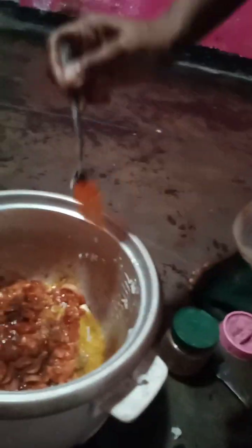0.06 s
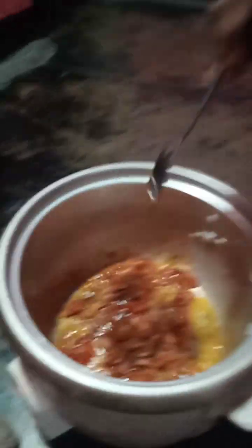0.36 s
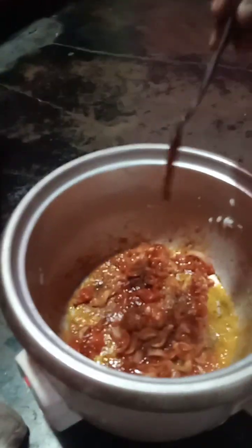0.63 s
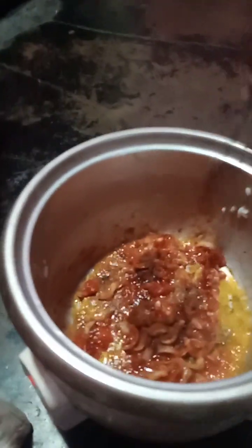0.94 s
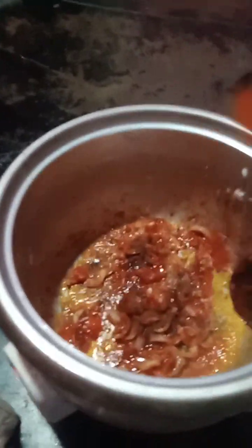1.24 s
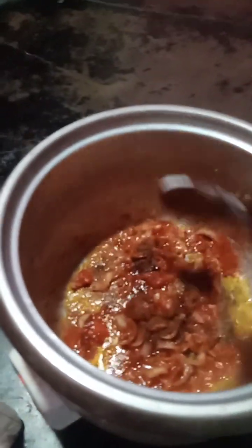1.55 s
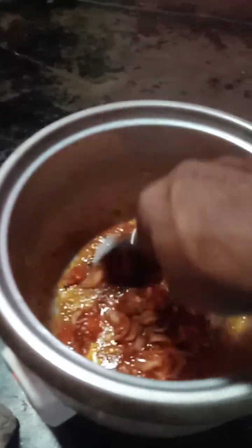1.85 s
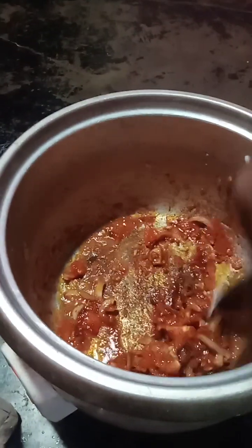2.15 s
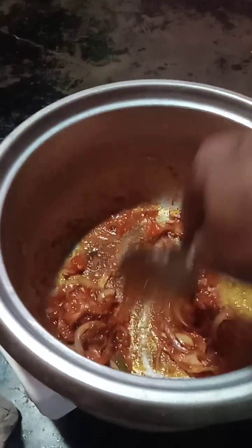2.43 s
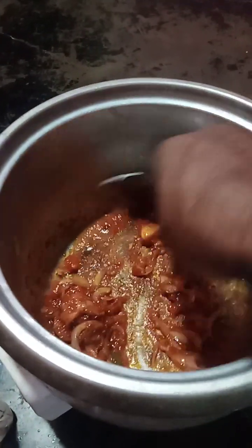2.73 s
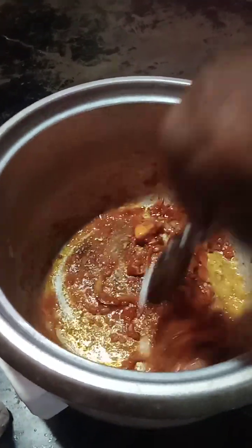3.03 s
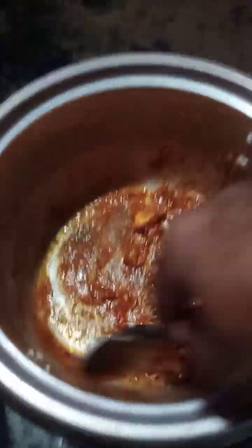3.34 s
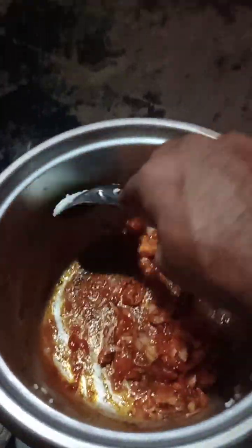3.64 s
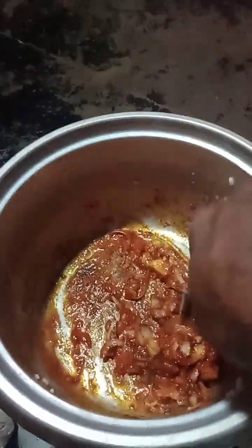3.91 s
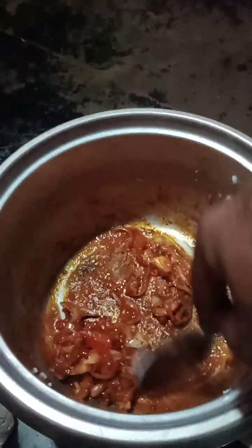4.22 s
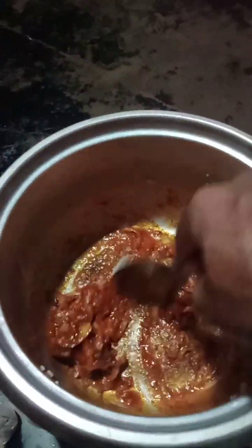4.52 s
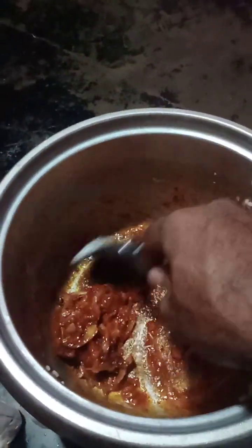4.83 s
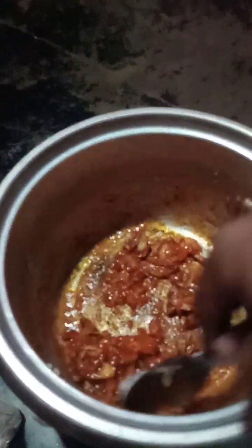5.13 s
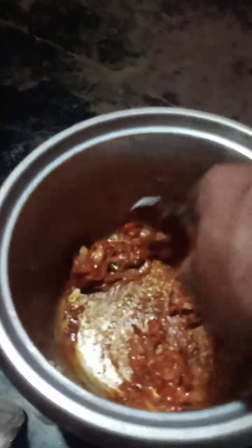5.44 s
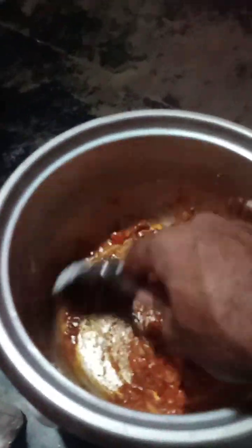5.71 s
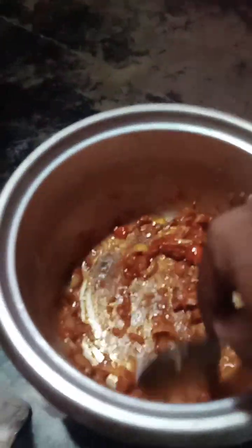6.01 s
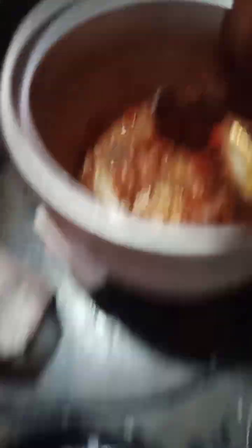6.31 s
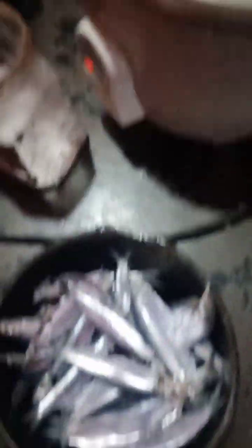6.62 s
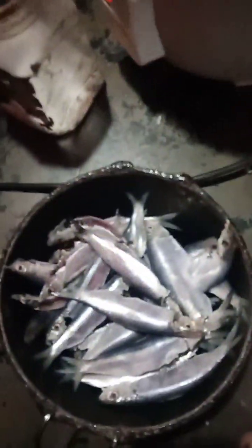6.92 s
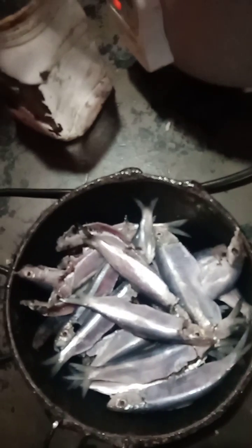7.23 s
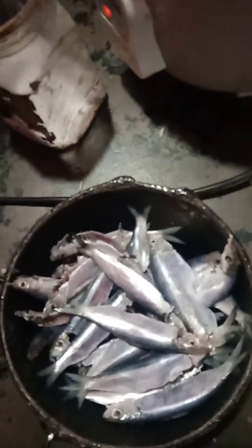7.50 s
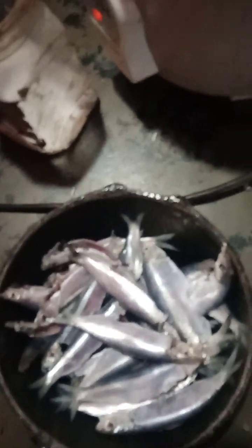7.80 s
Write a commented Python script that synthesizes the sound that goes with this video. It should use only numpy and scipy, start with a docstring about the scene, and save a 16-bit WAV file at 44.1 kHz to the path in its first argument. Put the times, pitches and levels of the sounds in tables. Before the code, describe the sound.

Spice paste fries in a metal pot throughout, a soft, grainy sizzle over a faint low simmer, heard from close by in a small kitchen. At about 0.9 seconds a steel spoon knocks twice on the rim, ringing briefly. From 1.5 seconds it stirs unevenly, with short scrapes, dull taps, tiny squeaks and faint wet squelches, the sizzle swelling slightly behind the strokes. A sharp, ringing clank lands at 2 seconds, another at 4.2 and a hard one at 5.9. Between them, taps and scrapes bunch together around 2.6, from 3.5 to 4, and from 5 to 5.4 seconds. From about 6 to 6.6 seconds the microphone turns away and the sizzle becomes a little softer and duller. Lighter knocks and hollow scrapes follow around 6.9 and 7.3 seconds, with a last scrape and clink just before the end at 8 seconds.

```python
"""A small kitchen, a phone's microphone close to the metal pot of an electric cooker.
Spice paste fries in it: steam bubbles burst in the oil as a grainy hiss over a low simmer. A steel
spoon knocks on the rim and sets the metal ringing, then scrapes, squeaks and taps around the pot,
the paste squelching behind it. Near the end the microphone turns away and the sizzle is shaded;
the phone's limiter holds the hard blows down to a plateau."""
import sys
import numpy as np
from scipy import signal
from scipy.fft import rfft, irfft, next_fast_len
from scipy.io import wavfile
from scipy.ndimage import uniform_filter1d, minimum_filter1d

SR = 44100
rng = np.random.default_rng(int(sys.argv[2]) if len(sys.argv) > 2 else 0)


def generate_wav(sig):
    """Save sig (samples, or channels by samples) to the path in sys.argv[1] as 16-bit PCM at SR."""
    pcm = np.round(np.clip(np.atleast_2d(sig).T, -1, 1) * 32767).astype(np.int16)
    wavfile.write(sys.argv[1], SR, pcm)


N = 351036
TIME = np.arange(N) / SR
FFT_SIZE = next_fast_len(N, True)
FREQ = np.maximum(np.fft.rfftfreq(FFT_SIZE, 1 / SR), 1)
ATTACK_S = .001

# The edges in Hz of the five bands into which the dense modes of the metal fall.
METAL_BANDS_HZ = [250, 600, 1500, 3000, 6000, 12000]
# The spoon dragged over the metal. Each row: start and length in seconds, pot body and spoon edge
# in relative dB, brightness in octaves above 1 kHz.
STROKES = [(1.552, 0.04, -50, -24.5, 3.43), (1.585, .06, -28.5, -46, 0.84), (1.713, .11, -33.5, -39.5, 1.2),
           (2.243, 0.13, -43, -41, 2.1), (2.577, 0.047, -38, -33, 2.3), (2.609, 0.029, -24.5, -28.5, 0.47),
           (2.691, .12, -35, -35.5, 2.46), (3.02, 0.062, -80, -43.5, 3.6), (3.222, 0.095, -43, -47, 2.4),
           (3.332, 0.04, -42, -36.5, 2.23), (3.409, 0.027, -34, -47, .5), (3.526, .03, -59, -40.5, 2.1),
           (3.605, 0.087, -44.5, -32.5, 3.46), (3.697, .14, -27.5, -28.5, 2.6),
           (4.291, 0.052, -44.5, -40, 2.5), (4.356, 0.07, -41, -48.5, 1.5),
           (4.721, .06, -31.5, -32.5, 1.64), (5.084, 0.17, -44, -42, 1.8),
           (5.555, 0.047, -49.5, -42.5, 2.9), (5.637, 0.074, -34, -37, 1.8),
           (6.033, 0.049, -52, -39.5, 1.66), (6.842, 0.13, -38, -44.5, 1.9), (7.281, .13, -39, -45, 1.4),
           (7.754, .19, -32.5, -39.5, 2.2)]


def undb(db):
    """Decibels to gain."""
    return 10 ** (np.asarray(db) / 20)


def unit(x):
    """Scale to rms 1."""
    return x / np.sqrt(np.mean(x ** 2))


def fade(t, t60):
    """Exponential decay, 60 dB down after t60 seconds."""
    return np.exp(-np.log(1000) * t / t60)


def colour(points):
    """Gain at every frequency from (Hz, dB) points."""
    hz, db = np.transpose(points)
    return undb(np.interp(np.log(FREQ), np.log(hz), db))


def fader(points):
    """Gain at every sample from (seconds, dB) points."""
    return undb(np.interp(TIME, *np.transpose(points)))


def shape(x, gain):
    """Filter by a gain at every frequency."""
    return irfft(rfft(x, FFT_SIZE) * gain, FFT_SIZE)[:N]


def walk(per_s):
    """Smooth random wander with a spread near 1."""
    knots = rng.standard_normal(int(N / SR * per_s) + 2)
    return np.interp(TIME * per_s, np.arange(len(knots)), knots)


def clicks(per_s, spread_db):
    """Randomly timed impulses; with a spread, most are small and a few large."""
    return (rng.random(N) < per_s / SR) * undb(spread_db * np.minimum(rng.exponential(size=N), 5))


def span(start, length):
    """The samples of an event and the time since its start."""
    where = slice(int(start * SR), min(int((start + length) * SR), N))
    return where, TIME[where] - TIME[where.start]


def sizzle(flicker_db=2.35, turn_start_s=6.06, turn_end_s=6.62):
    """Tiny steam bubbles burst in the oil, so many that they merge into a soft grainy hiss."""
    # The colour of frying oil as heard through the phone's microphone, with its treble peaks and dip.
    # Each row: frequency in Hz, gain in dB.
    oil_at_mic = [(300, -19), (650, -24), (1220, -10), (1550, -21), (2400, -11), (3300, -12), (4100, -2),
                  (4900, -12), (6050, 0.5), (6650, -6), (7500, 0.5), (9300, -11), (13600, -30),
                  (15100, -9.5)]
    # How hard the oil fries. Each row: time in seconds, relative level in dB.
    frying_levels = [(0, -49), (.35, -45.5), (.9, -44), (1.35, -41.5), (3, -44), (4.4, -44.5), (5.4, -40.5),
                     (6.2, -43.5), (7.96, -45)]
    # The finest fizz against the hiss. Each row: time in seconds, gain in dB before shading.
    fizz_levels = [(0, 0), (1.2, -4), (1.8, 4), (3, 4), (3.9, 7.5), (5.1, 1), (6, 4), (7.96, -4)]
    pops = unit(clicks(per_s=2500, spread_db=2.5) * rng.standard_normal(N))
    bursts = (pops + rng.standard_normal(N)) * undb(flicker_db * walk(35))
    band = np.digitize(FREQ, [5000, 9500])
    spatter, hiss, fizz = (shape(bursts, colour(oil_at_mic) * (band == k)) for k in range(3))
    steady, stirred = fader(frying_levels), flare()
    # as the microphone turns away, the pot's wall comes between it and the oil
    shade = np.clip((TIME - turn_start_s) / (turn_end_s - turn_start_s), 0, 1)
    spatter_gain = np.hypot(undb(-5) * steady, undb(2.5) * stirred) * undb(-11 * shade)
    hiss_gain = np.hypot(steady, stirred) * undb(1 - 2.2 * shade)
    fizz_gain = fader(fizz_levels) * undb(-5 * shade)
    return unit(hiss + fizz * fizz_gain) * hiss_gain + unit(spatter) * spatter_gain


def simmer(heave_db=4, gain_db=2):
    """The thick paste heaves and slides with a low uneven rumble."""
    # The colour of simmering paste. Each row: frequency in Hz, gain in dB.
    paste_colour = [(25, -16), (45, -37), (64, 7), (95, -10), (132, 5), (175, -7), (243, -2), (310, -20.5),
                    (400, -13), (600, -23.5), (1500, -24)]
    # How much the paste moves. Each row: time in seconds, relative level in dB.
    simmer_levels = [(0, -58.5), (1.05, -63.5), (1.6, -55.5), (2.7, -51), (4.1, -53), (4.5, -55),
                     (6.2, -53.5), (7, -56), (7.96, -71)]
    heaving = rng.standard_normal(N) * undb(heave_db * walk(28))
    return unit(shape(heaving, colour(paste_colour))) * fader(simmer_levels) * undb(gain_db)


def dense_modes(points):
    """Countless overlapping modes of metal, coloured by the pot's cavity, as five bands of rms 1."""
    # Resonances of the air in the pot. Each row: centre in Hz, width in Hz, lift in dB.
    air_resonances = [(257, 90, 13), (370.6, 80, 19), (446.8, 99, 26), (830, 253, 21), (1123, 168, 21),
                      (1262, 107, 23), (1737, 120, 6.5), (2326, 560, 8)]
    cavity_db = sum(db / (1 + (2 * (FREQ - hz) / width) ** 2) for hz, width, db in air_resonances)
    gain = colour(points) * undb(cavity_db)
    noise = rng.standard_normal(N)
    band = np.digitize(FREQ, METAL_BANDS_HZ[1:-1])
    return np.array([unit(shape(noise, gain * (band == k))) for k in range(len(METAL_BANDS_HZ) - 1)])


def contact(body_db, edge_db, brightness, body_hz, body_fall_db, edge_fall_db):
    """Band gains of one contact: a low hump from the pot's body, a broad one from the spoon's edge."""
    centres_hz = np.sqrt(np.multiply(METAL_BANDS_HZ[:-1], METAL_BANDS_HZ[1:]))
    octaves = np.log2(centres_hz / 1000)
    # the body sounds higher the harder it is pressed
    octaves_per_db, medium_press_db = .0532, -35
    body_octave = np.log2(body_hz / 1000) + octaves_per_db * (body_db - medium_press_db)
    body = undb(body_db - body_fall_db * (octaves - body_octave) ** 2)
    edge = undb(edge_db - edge_fall_db * (octaves - brightness) ** 2)
    return np.hypot(body, edge)


def snap(t):
    """The first instant of hard contact: a tick that reaches the very top."""
    return np.diff(rng.standard_normal(len(t) + 1)) * fade(t, t60=.0086)


def strikes(metal, snap_db=10, crack_db=15, ring_db=-11, grip_per_cycle=.0029):
    """Each hard blow cracks, sets the dense modes shimmering and leaves a few strong modes singing."""
    # Blows on rim and wall. Each row: start in seconds, pot body and spoon edge in relative dB,
    # brightness in octaves above 1 kHz, ringing in relative dB, frequency the spot favours in Hz,
    # lift of the lowest modes in dB, freedom to ring from 0 to 1.
    blows = [(.860, -52, -20.5, 2.1, -.5, 2100, -0.5, .6), (0.9817, -65, -28, 2.35, -13, 1900, 10, 0.97),
             (2.046, -48, -16.5, 1.98, 2, 2275, -15, 0.69), (4.162, -35, -24.5, 2.9, -10, 2030, -6, .8),
             (5.8547, -27.5, -18.5, 3, -3.5, 4075, -8.5, 0.56),
             (6.957, -45, -60, .6, -30.5, 1650, -3, 0.87), (7.2388, -40, -32.5, 3.5, -19.5, 5230, -6, 0.8),
             (7.8739, -37.5, -31, 4.1, -16.5, 5100, -17, 0.4)]
    # Modes of pot and spoon. Each row: frequency in Hz, relative level in dB, free t60 in seconds.
    strong_modes = [(371, -12.5, 1.4), (690, -17, .3), (1082, -11, .9), (1276, -13, .65), (1640, -12, .35),
                    (1739, -4, .33), (1781, -5, .27), (1860, -12, .33), (2032, -10, .3), (2097, -6, .3),
                    (2265, -6, .38), (2450, -5.5, .35), (2585, -11, .27), (2714, -4, .3), (3018, -8, .4),
                    (3219, -9, .3), (3560, -7, .22), (3720, -10, .25), (4075, -6.5, .5), (4480, -8, .3),
                    (5028, -9, .32), (5103, -4, .34), (5351, -3, .33), (5495, -9, .3), (6006, -8, .38),
                    (6290, -8, .3), (7144, -6, .25), (7612, -10, .3)]
    hz, db, t60 = np.transpose(strong_modes)[:, :, None]
    out = np.zeros(N)
    # the highest dense modes die with the crack
    dulled = signal.sosfilt(signal.butter(3, 8500, fs=SR, output="sos"), metal)
    for start, body_db, edge_db, brightness, tone_db, spot_hz, lift_db, freedom in blows:
        where, t = span(start, .87)
        bands = contact(body_db, edge_db, brightness, body_hz=700, body_fall_db=9, edge_fall_db=1.5)
        crack = undb(crack_db) * bands @ metal[:, where] * fade(t, t60=.036)
        shimmer = bands @ dulled[:, where] * fade(t, t60=.26)
        out[where] += undb(snap_db) * bands[-1] * snap(t) + crack + shimmer
        # each spot favours its own modes; the rim also wakes the lowest ones
        spot_db = 9 * np.exp(-((hz - spot_hz) / 130) ** 2) - 1.3 * np.abs(np.log2(hz / spot_hz))
        size = undb(db + spot_db + lift_db * hz[0] / hz + rng.standard_normal(hz.shape))
        # a spoon that stays against the wall shortens the ring, most of all in the high modes
        held_t60 = 1 / (1 / t60 + grip_per_cycle * hz * (1 - freedom))
        ring = size * rng.choice([-1, 1], hz.shape) * np.sin(2 * np.pi * hz * t) * fade(t, held_t60)
        out[where] += undb(ring_db + tone_db) * ring.sum(axis=0)
    return out


def scrapes(metal, slip_t60=.016, ring_db=-9, ring_t60=.34):
    """The spoon's edge sticks and slips; each slip jolts the pot, which sounds on after the stroke."""
    out = np.zeros(N)
    slips = clicks(per_s=600, spread_db=0)
    jolt_energy = signal.fftconvolve(slips, fade(TIME[:SR // 10], slip_t60) ** 2)[:N]
    chatter = np.sqrt(np.abs(jolt_energy))
    for start, length, body_db, edge_db, brightness in STROKES:
        where, t = span(start, length + .5)
        bands = contact(body_db, edge_db, brightness, body_hz=648, body_fall_db=11.5, edge_fall_db=2.6)
        progress = np.minimum(t / length, 1)
        pressure = np.sqrt(np.abs(np.sin(np.pi * progress)))
        grain = chatter[where] / np.sqrt(np.mean(chatter[where][t < length] ** 2))
        ring = undb(ring_db) * progress * fade(np.maximum(t - length, 0), ring_t60)
        out[where] += bands @ metal[:, where] * np.hypot(pressure * grain, ring)
    return out


def flare(gain_db=-9, full_stroke_s=.12, settle_t60=.36):
    """Each stroke drags wet paste over hot metal: the frying's level flares up, then settles."""
    out = np.zeros(N)
    for start, length, _, edge_db, _ in STROKES:
        where, t = span(start, 1)
        swell = np.minimum(t, length) / full_stroke_s
        out[where] += undb(gain_db + edge_db) * swell * fade(np.maximum(t - length, 0), settle_t60)
    return out


def squelches(gain_db=-9, spread_db=3, spread_octaves=.6, rise_octaves_per_s=5, wake_s=.08, pockets=4):
    """Pockets of air close in the paste behind each stroke, each a small rising blip."""
    out = np.zeros(N)
    for start, length, body_db, _, _ in STROKES:
        onsets = np.minimum(start + rng.random(pockets) * (length + wake_s), TIME[-1] - .01)
        for onset, (size, pitch) in zip(onsets, rng.standard_normal((pockets, 2))):
            where, t = span(onset, .1)
            hz = 620 * 2 ** (spread_octaves * pitch + rise_octaves_per_s * t)
            envelope = (1 - np.exp(-t / ATTACK_S)) * fade(t, t60=.067)
            blip = np.sin(2 * np.pi * np.cumsum(hz) / SR) * envelope
            out[where] += undb(gain_db + body_db + spread_db * size) * blip
    return out


def brief_tones(waver=.029):
    """Brief tones from spoon and pot: high squeaks, short judders and low hollow knocks."""
    # Each row: start and length in seconds, middle pitch in Hz, glide in octaves,
    # rms level at the crest in dB.
    tones = [(1.56, 0.016, 2626, 0.14, -26), (1.562, 0.032, 7600, -0.048, -22),
             (1.612, .02, 870, 0.12, -31.5), (2.146, 0.026, 778, 0.0024, -21.5),
             (2.609, 0.017, 830, -0.025, -21.5), (2.611, 0.037, 237, -0.24, -33),
             (3.537, .045, 700, 0.61, -37.5), (3.62, .034, 7300, 0, -32), (3.895, 0.026, 3720, 0, -33.5),
             (4.745, 0.024, 2535, 0.13, -26), (5.086, 0.017, 830, -.05, -25.5),
             (5.652, 0.036, 3390, 0.081, -31.5), (6.842, .09, 428.5, 0.0099, -39),
             (7.736, 0.087, 410, 0, -42)]
    out, wander = np.zeros(N), walk(300)
    for start, length, hz, glide, db in tones:
        where, t = span(start, length)
        pitch = hz * 2 ** (glide * (t / length - .5)) * (1 + waver * wander[where])
        tone = np.sqrt(2) * np.sin(2 * np.pi * np.cumsum(pitch) / SR)
        out[where] += undb(db) * np.sin(np.pi * t / length) * tone
    return out


def taps(spoon, metal, tick_db=9, thud_db=-13, ping_db=8, snap_db=-7):
    """Paste cushions a light tap and smothers the spoon's tick and ping; the pot's low body sounds on."""
    # Light taps in the paste. Each row: start in seconds, pot body and spoon edge in relative dB,
    # brightness in octaves above 1 kHz, pitch of the spoon's ping in Hz.
    light_taps = [(1.701, -20, -27, 2.2, 2410), (1.78, -39, -39, 2.1, 2490), (2.153, -22, -30, 1.7, 2280),
                  (2.6061, -29, -24.5, 2.4, 2290), (2.68, -27, -26, 2.6, 2430),
                  (2.697, -23.5, -23, 2.76, 2360), (3.071, -73, -40.5, 2.26, 3100),
                  (3.282, -54, -39.5, 2.2, 2520), (3.518, -40, -33.5, 1.45, 2560),
                  (3.63, -45, -28.5, 3.6, 2970), (3.675, -35, -26, 2.5, 2990),
                  (3.795, -38, -23.5, 3.2, 2760), (3.8236, -26.5, -43, 3.2, 2430),
                  (4.005, -48, -24.5, 1.9, 3080), (4.6148, -53, -30, 2.03, 2590),
                  (5.0246, -34.5, -28, 2, 3180), (5.04, -26.5, -22, 1.77, 2265),
                  (5.063, -42, -29, 2.4, 3120), (5.0874, -49, -26, 1.5, 1960),
                  (5.133, -36.5, -35, 3.2, 2360), (5.3098, -37, -23.5, 1.8, 3270),
                  (5.3624, -31.5, -29.5, 1.2, 2410), (5.472, -53, -38.5, 2.2, 3070),
                  (5.9686, -34, -33, 0.79, 2340), (6.0316, -34, -33.5, 1.9, 3520),
                  (6.091, -66, -34.5, 2.1, 2880), (6.399, -68, -48, 4.2, 3820),
                  (6.8399, -29, -42.5, 1.9, 2420), (6.9577, -29, -40, 2.2, 3010),
                  (7.216, -36, -30.5, 1.8, 2300), (7.321, -33.5, -38.5, 1.4, 2400),
                  (7.7304, -30.5, -64, 1.1, 2350)]
    out = np.zeros(N)
    for start, body_db, edge_db, brightness, ping_hz in light_taps:
        where, t = span(start, .5)
        bands = contact(body_db, edge_db, brightness, body_hz=595, body_fall_db=10.5, edge_fall_db=4.5)
        tick = undb(tick_db) * bands @ spoon[:, where] * fade(t, t60=.025)
        thud = undb(thud_db) * bands[:2] @ metal[:2, where] * fade(t, t60=.4)
        ping = undb(ping_db + edge_db) * np.sin(2 * np.pi * ping_hz * t) * fade(t, t60=.03)
        cushion = 1 - np.exp(-t / ATTACK_S)
        out[where] += (tick + ping + thud) * cushion + undb(snap_db) * bands[-1] * snap(t)
    return out


def kitchen(direct, first_echo_s=.014, echo_db=-9):
    """Diffuse echoes from the floor and near walls reach the microphone just after the direct sound."""
    t = TIME[:SR // 2]
    echoes = rng.standard_normal(len(t)) * fade(t, t60=.35) * (t > first_echo_s)
    echoes /= np.sqrt(np.sum(echoes ** 2))
    return direct + undb(echo_db) * signal.fftconvolve(direct, echoes)[:N]


def scene():
    """Spoon and pot over the frying, heard from close by in mono."""
    # The colour of metal on metal as heard through the phone's microphone, with its treble peaks
    # and dip. Each row: frequency in Hz, gain in dB.
    metal_at_mic = [(60, -34), (200, -7.5), (600, -8.5), (1450, -5), (2500, -3.5), (4700, -2), (5400, 1.5),
                    (6700, 4), (7600, 7.5), (9200, -4), (12000, -17), (13800, -54), (15000, -5),
                    (16000, -60)]
    # The colour of the spoon's bowl ticking on the bottom. Each row: frequency in Hz, gain in dB.
    spoon_colour = [(100, -9), (400, -15), (800, -5.5), (1300, -8), (1800, 5), (2450, 13), (3100, 11),
                    (4000, 9), (4700, 2.5), (5800, 6.5), (7600, 9), (9200, -5), (13500, -12), (15000, -25)]
    metal, spoon = dense_modes(metal_at_mic), dense_modes(spoon_colour)
    stirring = kitchen(strikes(metal) + taps(spoon, metal) + scrapes(metal) + brief_tones())
    return (stirring + sizzle() + simmer() + squelches())[None]


def limiter(x, ceiling_db=-5, release_db_per_s=170, window_samples=160):
    """Turns down just ahead of each peak and recovers at a steady rate."""
    excess_db = np.maximum(20 * np.log10(np.abs(x) + 1e-9) - ceiling_db, 0)
    held_db = -minimum_filter1d(-excess_db, window_samples)
    recovery_db = release_db_per_s * TIME
    cut_db = np.maximum.accumulate(held_db + recovery_db, axis=-1) - recovery_db
    return x * undb(-uniform_filter1d(cut_db, window_samples))


def record(dry, bass_hz=48, top_hz=15750):
    """The phone drops the deep bass, limits the peaks and cuts the top."""
    thin = signal.sosfilt(signal.butter(3, bass_hz, "high", fs=SR, output="sos"), dry)
    return signal.sosfilt(signal.ellip(10, .2, 70, top_hz, fs=SR, output="sos"), limiter(thin))


dry = scene()
out = record(dry)
generate_wav(out)
```